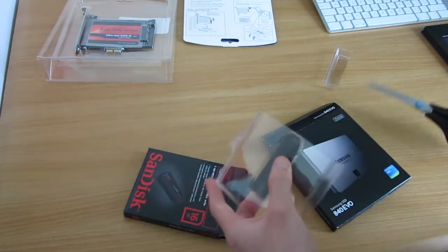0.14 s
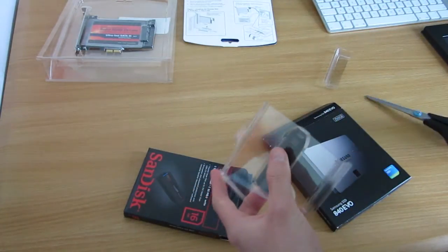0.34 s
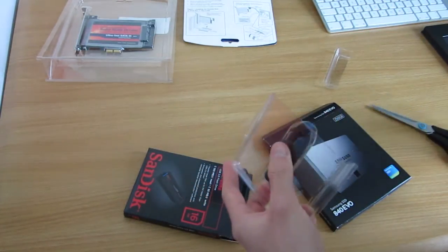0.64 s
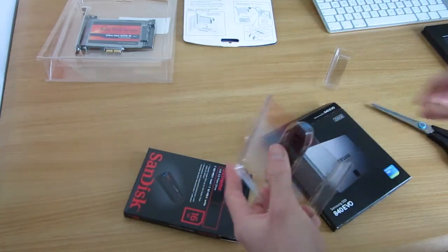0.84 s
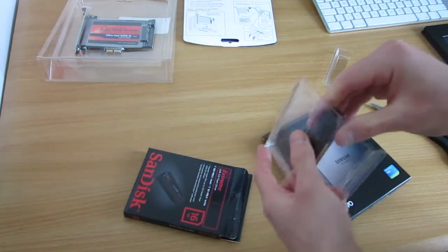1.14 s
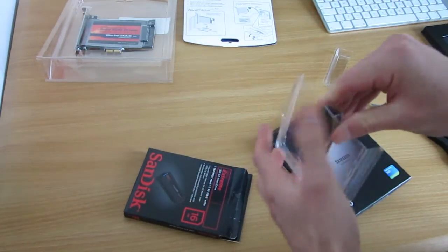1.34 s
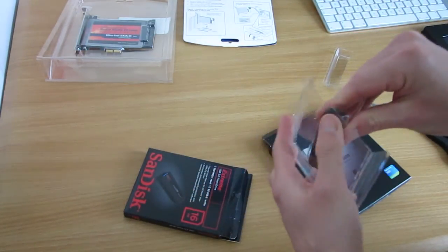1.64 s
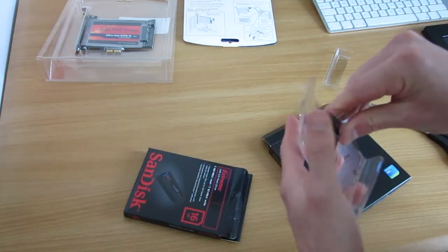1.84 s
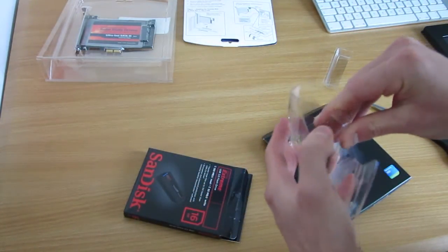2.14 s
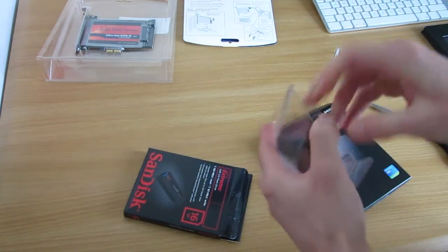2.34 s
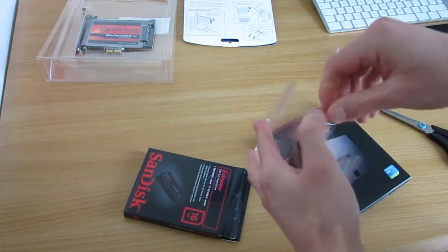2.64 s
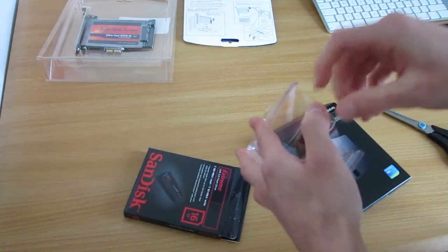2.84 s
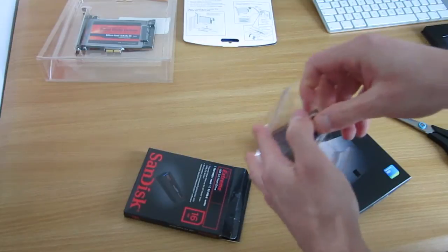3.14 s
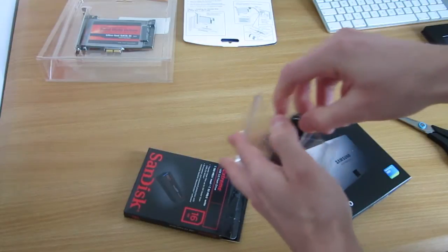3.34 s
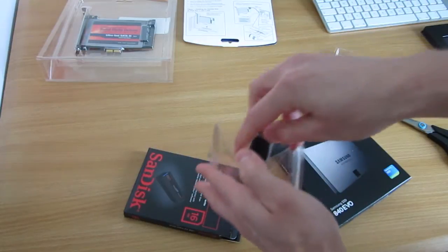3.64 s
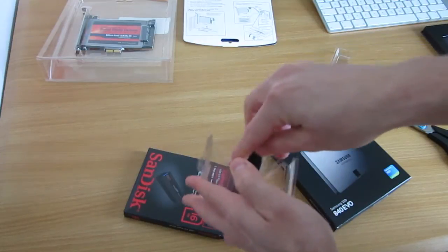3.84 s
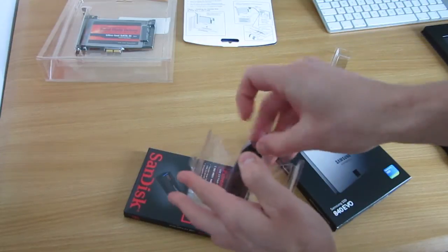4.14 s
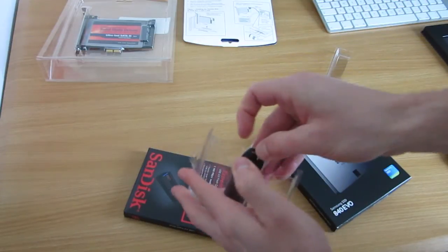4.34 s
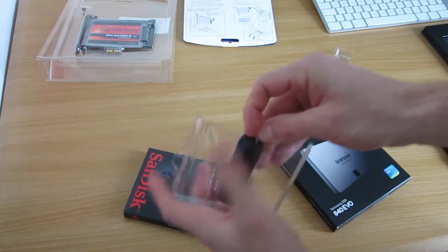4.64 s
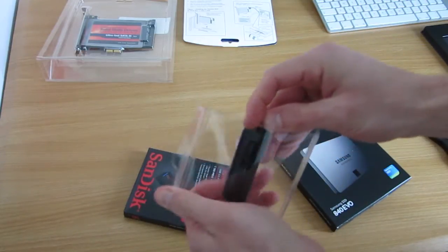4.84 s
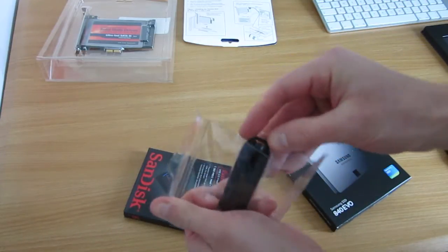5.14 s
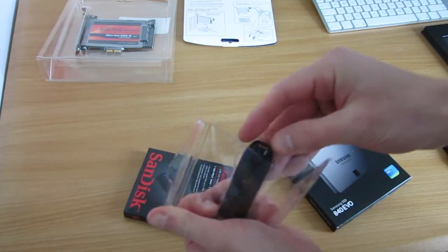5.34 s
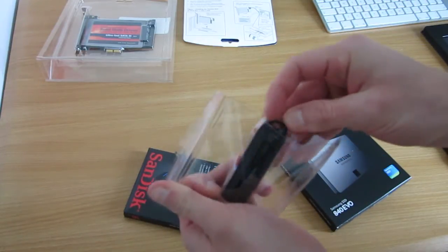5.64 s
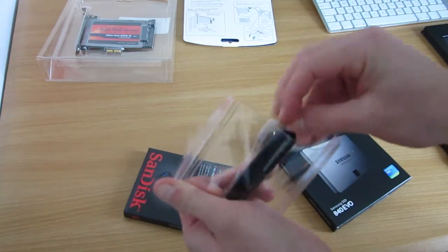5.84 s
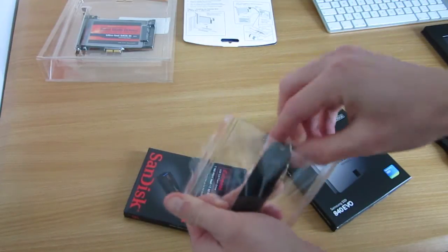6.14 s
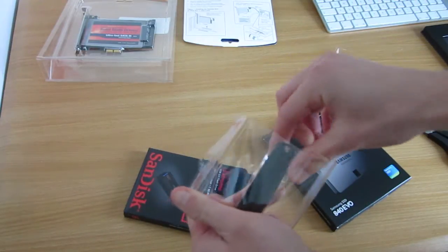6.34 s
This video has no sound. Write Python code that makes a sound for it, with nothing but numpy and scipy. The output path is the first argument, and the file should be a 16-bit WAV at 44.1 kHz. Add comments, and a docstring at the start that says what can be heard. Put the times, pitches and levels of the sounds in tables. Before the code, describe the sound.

Hands work a hard plastic package near the microphone. Scissors are set down first with small steely clinks and dull wooden taps. Fingers rustle and tick on the plastic, a bright loud snap rings out, several more follow, then the shell gives way with the hardest crack. Duller buckling and scraping continue to a last strong snap, with short room reflections and a faint camera whine.

```python
"""A stiff plastic blister pack is pried apart by two hands at a wooden desk in a small room.
Its shell buckles in sharp snaps: noise cracks, a facet's brief ring and a low pulse of air.
Its halves rustle, tick and scrape: random stick-slip clicks, each with its own short ring.
Among the first snaps, scissors are laid on the desk: ringing steel and wood modes, and noise bursts.
The camera whines faintly over rumble and hiss; its limiter ducks at the hardest snaps."""
import sys
import numpy as np
from scipy import signal
from scipy.fft import rfft, irfft
from scipy.io import wavfile
from scipy.ndimage import uniform_filter1d

SR = 44100
rng = np.random.default_rng(int(sys.argv[2]) if len(sys.argv) > 2 else 0)


def bounce(signal):
    """Save signal as a 16-bit WAV file at the path given by the first command-line argument."""
    frames = np.transpose(np.atleast_2d(signal))
    limited = np.clip(frames, -1, 1)
    pcm = np.round(limited * 32767).astype(np.int16)
    wavfile.write(sys.argv[1], SR, pcm)


N = 286209


def gain_of(db):
    """Decibels to amplitude."""
    return 10 ** (np.asarray(db) / 20)


def evened(x):
    """Scales to rms 1."""
    return x / np.sqrt(np.mean(x ** 2) + 1e-20)


def blow(x):
    """Scales to the energy of 10 ms at rms 1."""
    return x / np.sqrt(np.sum(x ** 2) / (.01 * SR) + 1e-20)


def read(points, hz):
    """Reads a spectrum on a log-frequency axis."""
    f, value = np.transpose(points)
    return np.interp(np.log(hz + 1), np.log(f), value)


def level(curve):
    """A curve in dB as a gain for each sample, at -120 dB outside its span."""
    s, db = np.transpose(curve)
    return gain_of(np.interp(np.arange(N) / SR, s, db, left=-120, right=-120))


def add(mix, s, sound):
    """Mixes a sound in at time s."""
    part = mix[max(round(s * SR), 0):][:len(sound)]
    part += sound[:len(part)]


def decay(t, t60):
    """Exponential dying away by 60 dB in t60 seconds."""
    return np.exp(-np.log(1000) * t / t60)


def band_pass(x, order, edges_hz):
    """Keeps the sound between two edges."""
    return signal.sosfilt(signal.butter(order, edges_hz, "band", fs=SR, output="sos"), x)


def colour(x, points, tilt_db=0):
    """Causal minimum-phase filter with the given spectrum, tilted by dB per octave about 4 kHz."""
    hz = abs(np.fft.fftfreq(2048, 1 / SR))
    tilt = tilt_db * np.log2(hz / 4000 + .1)
    log_gain = np.log(gain_of(read(points, hz) + tilt))
    # the Hilbert transform of the log gain gives the phase
    taps = np.fft.ifft(np.exp(np.conj(signal.hilbert(log_gain)))).real
    return signal.fftconvolve(x, taps[:len(taps) // 2])[:len(x)]


def ring(modes):
    """Free ringing of a body: decaying sines, each starting at a random phase."""
    t = np.arange(SR // 2) / SR
    out = np.zeros(len(t))
    for hz, db, t60 in modes:
        out += gain_of(db - 60 * t / t60) * np.sin(2 * np.pi * (hz * t + rng.random()))
    return out


def slips(count, per_s, spread_db):
    """Stick-slip friction: random clicks, their sizes spread by an exponential draw in dB."""
    size = gain_of(spread_db * np.minimum(rng.exponential(1, count), 4))
    happens = rng.random(count) < per_s / SR
    return size * rng.standard_normal(count) * happens


def grains(count, per_s, spread_db, grain_t60=0.0027, size=8):
    """Slips at several spots of the sheet, each with its own brief noisy ring."""
    t = np.arange(SR // 100) / SR
    spots = rng.standard_normal((size, len(t))) * decay(t, grain_t60)
    return sum(signal.fftconvolve(slips(count, per_s / size, spread_db), spot)[:count] for spot in spots)


# Spectrum of the room's steady hiss and low rumble: pitch_hz, relative_density_db (dB per Hz)
HISS_SPECTRUM = [(15, 1), (30, 1), (100, -1), (200, -2.5), (350, -1), (620, -7), (1300, -10.5),
                 (2500, -16.5), (4500, -20), (7000, -20), (8600, -16.5), (11000, -23.5), (14400, -35),
                 (16000, -36.5)]


def background(hiss_db=-66, whine_db=-73, whine_hz=7880, whine_width_hz=45):
    """Room rumble and hiss as shaped noise, with the camera's whine as a narrow, fuzzy band."""
    hz = np.fft.rfftfreq(N, 1 / SR)
    hiss = irfft(rfft(rng.standard_normal(N)) * gain_of(read(HISS_SPECTRUM, hz)), N)
    whine_shape = 1 / (1 + ((hz - whine_hz) / (2 * whine_width_hz)) ** 2)
    whine = irfft(rfft(rng.standard_normal(N)) * whine_shape, N)
    return gain_of(hiss_db) * evened(hiss) + gain_of(whine_db) * evened(whine)


# Dull rumble of arms moving over the desk: time_s, level_db
ARM_RUMBLE = [(0, -80), (1.2, -65), (1.62, -72), (1.8, -93), (3.2, -72), (3.6, -89), (6.49, -92)]


def rumble(top_hz=110):
    """Low, soft noise that follows the arms."""
    low = signal.sosfilt(signal.butter(2, top_hz, fs=SR, output="sos"), rng.standard_normal(N))
    return level(ARM_RUMBLE) * evened(low)


# Fingers shifting their grip on the pack: time_s, level_db (before the rustle and tick shares)
GRIP_SHIFTS = [(0, -75), (.8, -78.5), (1.1, -64), (1.6, -61.5), (1.92, -73), (2.7, -96), (3.03, -71),
               (3.22, -62), (3.45, -74), (3.9, -72.5), (4.2, -58), (4.42, -70), (4.6, -63), (5.0, -56.5),
               (5.14, -76.5), (6.15, -74.5), (6.4, -56), (6.49, -67)]
# Plastic sliding on plastic: start_s, length_s, level_db, brightness_db_per_octave
SCRAPE_STROKES = [(1.167, 0.062, -51, 0.5), (1.557, 0.041, -55, -8), (2.307, 0.085, -54.5, -3.5),
                  (2.628, 0.021, -52.5, -6), (2.986, 0.071, -59.5, 8), (4.068, 0.044, -56.5, -2.5),
                  (4.508, 0.065, -57.5, -1.5), (4.597, 0.069, -39.5, 1), (4.643, 0.15, -45.5, 1),
                  (4.768, 0.011, -39, 3), (5.76, 0.046, -59.5, 4), (5.938, 0.054, -49, -3.5),
                  (6.376, 0.082, -52.5, -4)]
# What the plastic shell radiates: pitch_hz, relative_level_db
SHELL_SPECTRUM = [(100, -10), (230, -11), (450, -2), (750, -6.5), (1400, 2), (2800, 3), (5000, 2),
                  (7000, 2.5), (9300, 7), (11000, -3), (13000, -12), (16000, -18)]
# Modes of the whole shell flexing, the last two being its hollow: pitch_hz, relative_level_db, t60_s
SHELL_MODES = [(181.6, -3, 0.087), (218.8, -1.5, 0.038), (429.7, 3, 0.057), (467, -13.5, 0.27)]


def rubbing(rustle_db=-7, ticks_db=-5, hollow_db=-18):
    """The halves scrape on each other in short strokes, and rustle and tick under the fingers."""
    rustle = evened(colour(grains(N, per_s=670, spread_db=1.5), SHELL_SPECTRUM, tilt_db=-1.5))
    ticks = evened(colour(grains(N, per_s=200, spread_db=0), SHELL_SPECTRUM, tilt_db=-0.4))
    out = level(GRIP_SHIFTS) * (gain_of(rustle_db) * rustle + gain_of(ticks_db) * ticks)
    for s, length, db, tilt_db in SCRAPE_STROKES:
        count = int(length * SR)
        stroke = signal.windows.tukey(count, .5)
        friction = grains(count, per_s=2800, spread_db=-1.0) * stroke
        # the slips sound directly and also set the hollow of the blister humming
        hollow = signal.fftconvolve(friction, ring(SHELL_MODES[2:]))
        hum = hollow * np.sqrt(count) / (np.linalg.norm(hollow) + 1e-20)
        add(out, s, gain_of(db) * evened(colour(friction, SHELL_SPECTRUM, tilt_db)))
        add(out, s, gain_of(db + hollow_db) * hum)
    return out


def damped(x, top_db=-6):
    """The fingers lying on the plastic take the top off its rubbing."""
    return colour(x, [(10500, 0.0045), (15000, top_db)])


def crack(t, t60, flutter_db=-18, flutter_t60=.045, evenness=0.16, size=36):
    """A burst of bending waves and their flutter across the sheet, whose many modes even out the colour."""
    envelope = decay(t, max(t60, .002)) + gain_of(flutter_db) * decay(t, flutter_t60)
    burst = rng.choice([-1., 1.], len(t)) * envelope
    power = uniform_filter1d(abs(rfft(burst)) ** 2, size)
    bumps_db = 10 * np.log10(power / power.mean())
    hz = np.fft.rfftfreq(len(t), 1 / SR) + 1
    # part of each bump in the spectrum is taken back out
    return colour(burst, np.column_stack([hz, -min(evenness, 1) * bumps_db]))


# Bands that share out the energy of a snap: low_hz, high_hz
SNAP_BANDS = [(130, 1100), (1100, 3500), (3500, 7000), (7000, 16000)]


def snap(t60, hz, band_db, tilt_db, tone_db=-15, tone_t60=0.012, waver=0.25):
    """A facet flips: a crack of bending waves, and the brief ring of the facet itself."""
    t = np.arange(SR // 16) / SR
    # the facet's pitch is unsteady while its tension settles
    turns = np.cumsum(hz * (1 + waver * rng.standard_normal(len(t)))) / SR
    tone = gain_of(tone_db) * np.sin(2 * np.pi * turns) * decay(t, tone_t60)
    sheet = colour(crack(t, t60) + tone, SHELL_SPECTRUM, tilt_db)
    # the size and stiffness of the facet set how the energy is shared from bass to treble
    out = np.zeros(len(t))
    for db, band in zip(band_db, SNAP_BANDS):
        out += gain_of(db) * blow(band_pass(sheet, 3, band))
    return out


def puff(push_db, width_s=0.00023):
    """The flipping facet also shoves the air: one short low pulse."""
    u = np.arange(SR // 16) / SR / width_s
    return gain_of(push_db) * blow(np.exp(-u) * u - 0.045 * np.exp(-u / 16))


# the pack gives way at the hardest snap; before it the shell is taut, after it slack
OPENS_S = 3.2816


def buckle(s, db, brightness_db, t60, scatter_octaves=0.068, lean=0.45):
    """A snap with its energy on one arch from bass to treble: tilted by brightness, narrower if dull or slack."""
    middle_hz, dullest_hz = 4000, 1450
    # fall of bass and treble in dB per octave squared; push of air in dB relative to the lowest band
    arch_db, push_db = (0.84, -9.5) if s < OPENS_S else (2.03, -14.5)
    # even the largest facets centre their arch no lower than dullest_hz
    arch_db = max(arch_db, brightness_db / (2 * np.log2(dullest_hz / middle_hz)))
    octaves = np.log2(np.sqrt(np.prod(SNAP_BANDS, axis=1)) / middle_hz)
    shape_db = brightness_db * octaves - arch_db * octaves ** 2
    band_db = db + shape_db - 20 * np.log10(np.linalg.norm(gain_of(shape_db)))
    # smaller facets sound brighter and ring higher; 2883 Hz at brightness 0
    rise_octaves = .17 * brightness_db + scatter_octaves * rng.standard_normal()
    ring_hz = 2883 * 2 ** rise_octaves
    return snap(t60, ring_hz, band_db, lean * brightness_db) + gain_of(band_db[0]) * puff(push_db)


# Each buckling of the shell: time_s, level_db (over 10 ms), brightness_db_per_octave,
# crack_t60_s (2 ms at least)
SHELL_SNAPS = [(0.166, -54, 5, 0.0033), (0.9742, -55, 1.5, 0.083), (1.1058, -51, -1.5, 0.057),
               (1.1776, -43.5, 7, 0.025), (1.1959, -42, 7, 0.019), (1.2629, -49, -2, 0.0026),
               (1.4258, -51.5, 4.5, 0.028), (1.489, -44, 6.5, 0.0027), (1.5224, -52.5, 1.5, 0.018),
               (1.67, -13, 4.5, 0.0029), (1.706, -29.5, 1, 0.052), (1.827, -45, 3.5, 0.0018),
               (1.845, -37.5, 6.5, 0.0025), (1.991, -60, -13, 0.015), (2.0845, -25, 2, 0.013),
               (2.0939, -25.5, 0.6, 0.0054), (2.1871, -20.5, 3, 0.019), (2.268, -46, -9.5, 0.042),
               (2.328, -37, 0.5, 0.034), (2.653, -30.5, 0, 0.067), (2.6781, -35, -2, 0.086),
               (2.7634, -49.5, -5, 0.055), (2.9188, -56.5, 1.5, 0.012), (3.2808, -0.5, 3.5, 0.0089),
               (3.3676, -39, 5, 0.0055), (3.576, -54.5, 1.5, 0.015), (3.8364, -37, 6.5, 0.0056),
               (4.099, -52.5, -2, 0.02), (4.315, -37, -9, 0.033), (4.3605, -56.5, 1.5, 0.0063),
               (4.609, -35.5, 3, 0.018), (4.708, -32, 4.5, 0.0056), (4.7208, -38, -6, 0.038),
               (4.74, -24.5, 1, 0.023), (4.9984, -47, -4.5, 0.0031), (5.0208, -52, -0.5, 0.004),
               (5.229, -61, -0.5, 0.0096), (5.3576, -27.5, -4.5, 0.019), (5.4104, -40, -0.5, 0.017),
               (5.4197, -33, -2, 0.0026), (5.4397, -20.5, -1.1, 0.0074), (5.5675, -26, 0.04, 0.0022),
               (5.594, -40, -3.5, 0.034), (5.698, -28, -5, 0.086), (5.7057, -20.5, -3.5, 0.0073),
               (5.9519, -32, -3.5, 0.058), (6.041, -7, 1, 0.0045), (6.1933, -50.5, -7, 0.0079),
               (6.2306, -49.5, 2, 0.006), (6.2498, -45.5, -6.5, 0.017), (6.273, -40.5, -6.5, 0.0048),
               (6.326, -30.5, -7, 0.012), (6.3646, -38.5, -5.5, 0.025)]
# The whole shell flexing under a snap: time_s, level_db (over 10 ms)
SHELL_FLEXES = [(2.083, -41), (2.68, -46.5), (5.3586, -45.5), (5.4407, -47), (5.696, -52.5)]


def shell(lead_s=0.00022, pop_db=-20.0, pop_width_s=.00027):
    """The snaps of the pack, its hollow flexing, and the pop of air let out as it gives way."""
    out = np.zeros(N)
    for s, db, brightness_db, t60 in SHELL_SNAPS:
        add(out, s - lead_s, buckle(s, db, brightness_db, t60))
    for s, db in SHELL_FLEXES:
        add(out, s, gain_of(db) * blow(ring(SHELL_MODES)))
    add(out, OPENS_S, puff(pop_db, pop_width_s))
    return out


# Scissors meeting the desk: time_s, steel_db, wood_db, clatter_db (each before the trims below)
DESK_KNOCKS = [(0.3143, -39, -46, -53), (0.3386, -44, -48, -53), (0.355, -50.5, -53, -69),
               (.369, -54, -66, -57), (0.551, -83, -56.5, -46), (0.6207, -58, -36.5, -51.5),
               (0.6902, -46, -42.5, -34), (0.708, -74, -36, -52), (0.734, -76, -38.5, -53),
               (.762, -81, -41.5, -67)]
# Blades sliding on wood: time_s, level_db (before the shares of ring and grit)
BLADE_SLIDE = [(.385, -68), (.43, -48), (.47, -42.5), (.505, -56), (.55, -71)]
# Modes of the steel blades: pitch_hz, relative_level_db, t60_s
STEEL_MODES = [(1170, -10, 0.17), (1832, -7.5, 0.12), (1959, 3, 0.07), (3155, 1, 0.026),
               (3270, -8.5, 0.053)]
# Lowest modes of the desk top: pitch_hz, relative_level_db, t60_s
WOOD_MODES = [(161.4, 0, 0.24), (230.4, -0.5, 0.37), (264, -4.5, 0.23), (412, 8, 0.25), (493, -14, .15),
              (702, 1, 0.25)]
# Spectrum of the clatter on the desk: pitch_hz, relative_level_db
CLATTER_SPECTRUM = [(100, -8.5), (300, 1.5), (900, -0.5), (1700, 4), (3300, -4), (5000, -14.5), (9000, -22),
                    (16000, -69)]


def scissors(clatter_t60=0.16, thud_hz=800, thud_t60=.14, tick_t60=0.03, tick_db=-3):
    """The blades clink and slide, then the handles drop on the desk top: ringing modes and noise bursts."""
    out, t = np.zeros(N), np.arange(SR // 2) / SR

    def burst(t60):
        """Noise dying away."""
        return rng.standard_normal(len(t)) * decay(t, t60)

    for s, steel_db, wood_db, clatter_db in DESK_KNOCKS:
        tick = band_pass(burst(tick_t60), 4, [3500, 9800])
        # above its lowest modes the desk top rings too densely for any pitch
        thud = band_pass(burst(thud_t60), 2, [170, thud_hz])
        steel = blow(ring(STEEL_MODES)) + gain_of(tick_db) * blow(tick)
        wood = gain_of(-2.0) * blow(ring(WOOD_MODES)) + gain_of(-4.5) * blow(thud)
        clatter = blow(colour(burst(clatter_t60), CLATTER_SPECTRUM))
        add(out, s, gain_of(steel_db) * steel)
        add(out, s, gain_of(wood_db) * wood)
        add(out, s, gain_of(clatter_db + 2.5) * clatter)
    grit = slips(N, per_s=5000, spread_db=1.5)
    blades = evened(signal.fftconvolve(grit, ring(STEEL_MODES))[:N])
    scratch = evened(colour(grit, CLATTER_SPECTRUM, tilt_db=3.5))
    return out + level(BLADE_SLIDE) * (gain_of(-12) * blades + gain_of(-5.5) * scratch)


# How long the small room rings: pitch_hz, t60_s
ROOM_DECAY = [(150, .27), (450, .32), (900, .24), (2500, .25), (9000, .22), (15000, .12)]
# Colour of its tail: pitch_hz, relative_level_db
ROOM_SPECTRUM = [(100, -16), (280, -5), (450, 1.5), (700, 4), (1500, -0.5), (9000, -1.5), (15000, 5)]


def room(x, wet_db=-12.5, desk_s=.0037, desk_db=-14, build_s=0.0051):
    """One bounce off the desk, then the short diffuse tail of a small room, dying at its own rate per pitch."""
    hz, t, z = signal.stft(rng.standard_normal(SR // 2), SR, nperseg=256)
    start_db = read(ROOM_SPECTRUM, hz)[:, None]
    z = z * gain_of(start_db - 60 * t / read(ROOM_DECAY, hz)[:, None])
    tail = signal.istft(z, SR, nperseg=256)[1]
    # the diffuse sound takes a few milliseconds to build up
    tail = tail * (1 - np.exp(-(np.arange(len(tail)) / SR / build_s) ** 2))
    echo = gain_of(wet_db) * tail / np.linalg.norm(tail)
    echo[round(desk_s * SR)] += gain_of(desk_db)
    return x + signal.fftconvolve(x, echo)[:N]


def scene():
    """Pack and scissors in the room, over the arms' rumble and the background."""
    in_room = room(shell() + damped(rubbing()) + scissors())
    return (in_room + rumble() + background())[None]


def record(dry, limit_db=-10.0, ceiling_db=-4, recovery_db_per_s=12, size=66, edge_hz=16150):
    """A fast limiter ducks and recovers slowly; the spikes that it lets by are flattened; then the band limit."""
    power_db = 10 * np.log10(abs(uniform_filter1d(dry[0] ** 2, size)) + 1e-12)
    release = np.arange(N) / SR * recovery_db_per_s
    over_db = np.maximum(power_db - limit_db, 0)
    # each duck is held, less the recovery since then
    duck_db = np.maximum.accumulate(over_db + release) - release
    held = dry * gain_of(-duck_db)
    clipped = held / (1 + (held / gain_of(ceiling_db)) ** 6) ** (1 / 6)
    low_pass = signal.firwin(255, edge_hz, window=("kaiser", 9), fs=SR)
    return signal.oaconvolve(clipped, low_pass[None], "same")


dry = scene()
out = record(dry)
bounce(out)
```